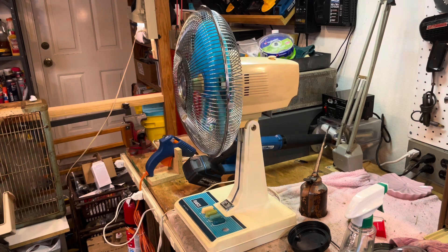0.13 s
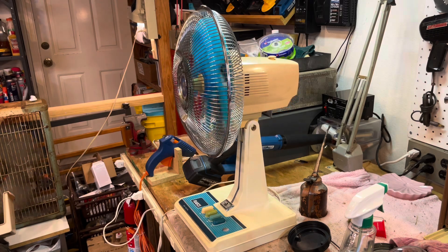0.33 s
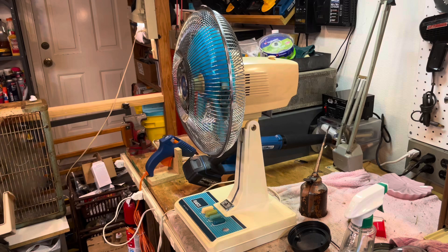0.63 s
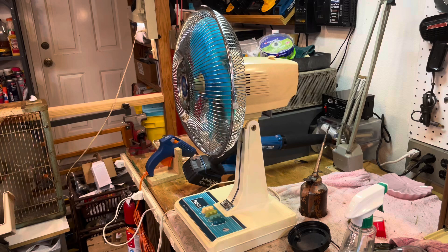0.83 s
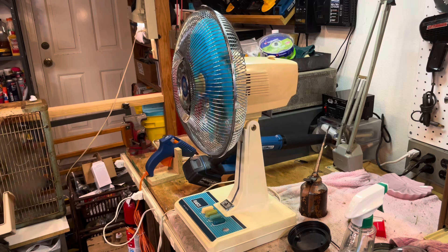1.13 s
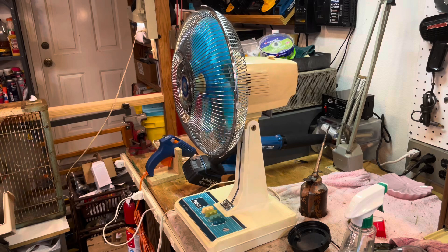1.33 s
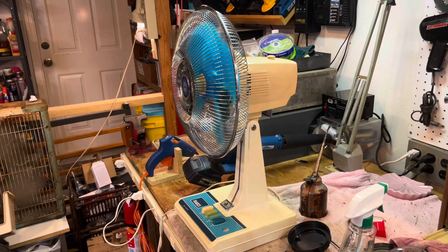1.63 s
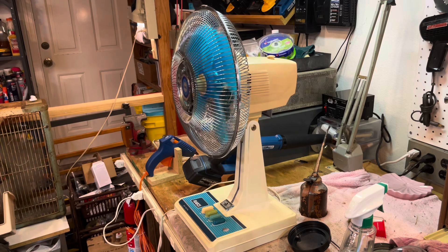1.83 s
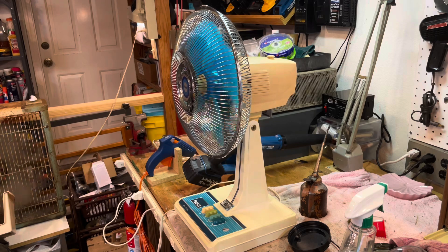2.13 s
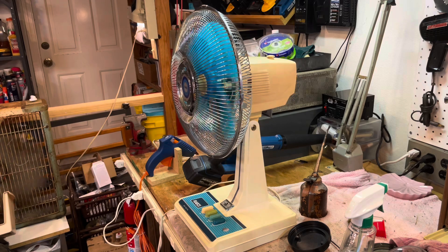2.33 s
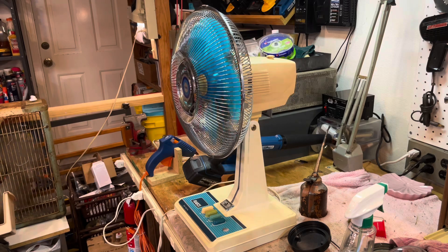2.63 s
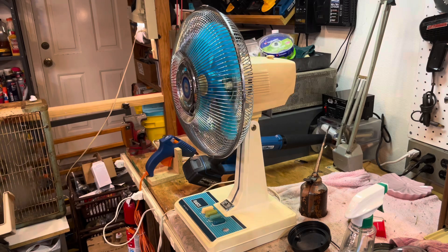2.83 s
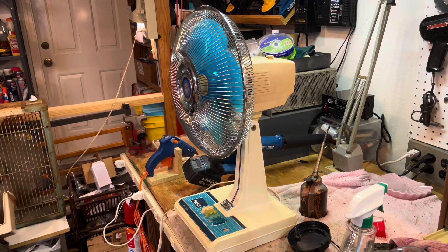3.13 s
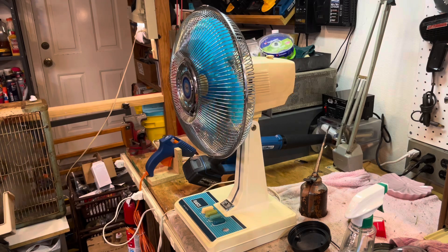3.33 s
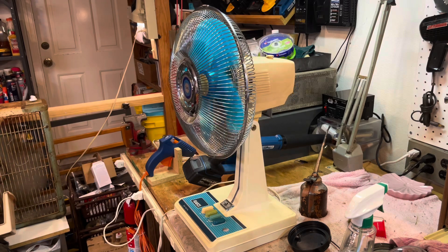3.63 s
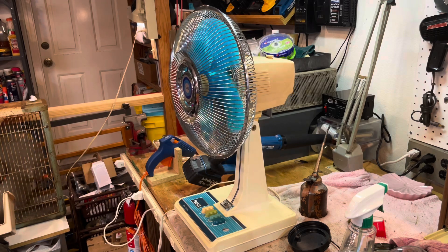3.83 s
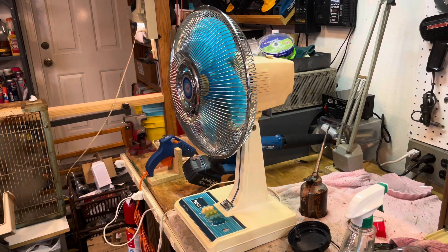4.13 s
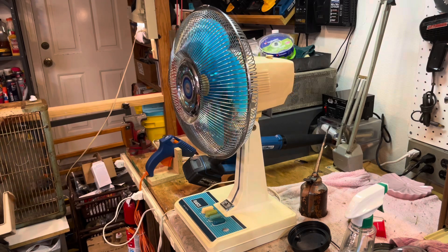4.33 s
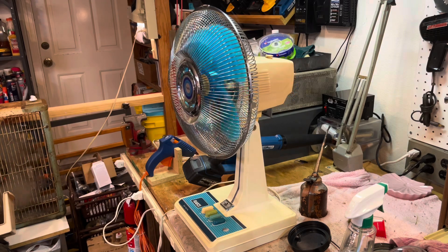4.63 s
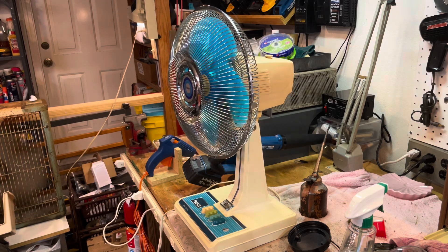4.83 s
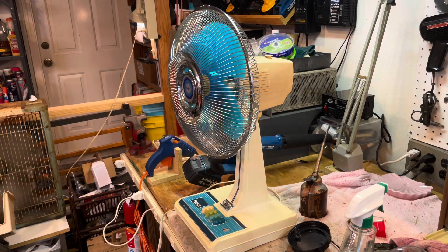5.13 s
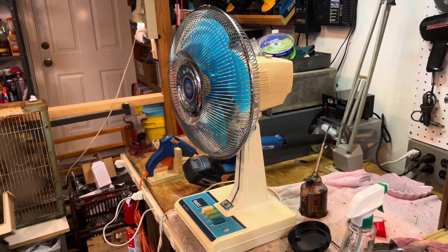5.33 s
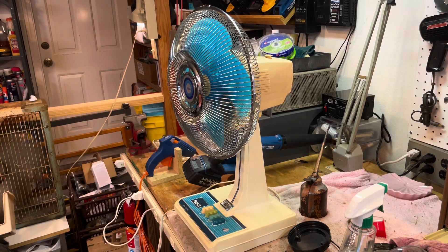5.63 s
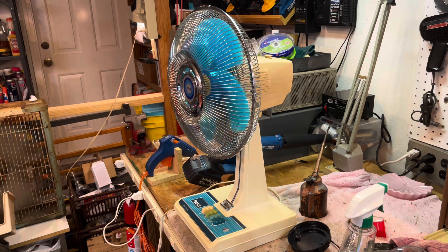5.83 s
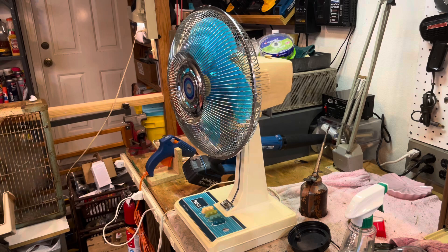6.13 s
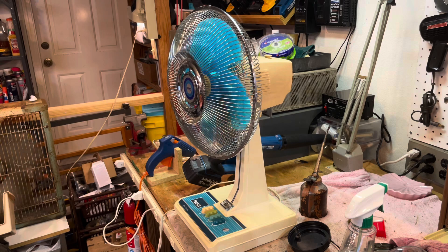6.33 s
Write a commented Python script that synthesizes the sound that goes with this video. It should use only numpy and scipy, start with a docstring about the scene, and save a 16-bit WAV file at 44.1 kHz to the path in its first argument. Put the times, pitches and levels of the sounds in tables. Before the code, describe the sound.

An electric desk fan runs without a break in a cluttered workshop, heard close in stereo. A strong low blade throb and mains hum sit under a soft rush of air with a thin whine. Gusts knock and flutter against the microphone, mostly during the first three seconds, then the bass drops, the flow steadies, and a few thumps return near the end.

```python
"""Desk fan on a workbench

A three-bladed fan slowly swings its head: blade-passing tones throb below band-shaped air noise.
The motor adds mains-harmonic hum, which sinks and returns, and thin whines, all wavering sines.
Turbulent rumble rises in gusts; eddies buffet the two microphone ports as short pressure pulses
with grainy noise flutters. At times the bass sinks away beneath the steady flow."""
import sys
import numpy as np
from scipy import signal
from scipy.fft import rfft, irfft
from scipy.io import wavfile
from scipy.ndimage import uniform_filter1d, minimum_filter1d

SR = 44100
rng = np.random.default_rng(int(sys.argv[2]) if len(sys.argv) > 2 else 0)


def file_out(sig):
    """Save sig as 16-bit WAV at sys.argv[1]."""
    # one column per channel
    cols = np.atleast_2d(sig).T
    # limit, then scale
    lim = np.clip(cols, -1, 1)
    pcm = np.round(lim * 32767).astype(np.int16)
    wavfile.write(sys.argv[1], SR, pcm)


N = 286063
TIME = np.arange(N) / SR  # s
FREQS = np.fft.rfftfreq(N, 1 / SR)  # Hz
SIDES = np.array([[1], [-1]])  # left, right


def undb(db):
    """Logarithmic level: decibels become an amplitude ratio."""
    return 10 ** (np.asarray(db) / 20)


def across(points):
    """Spectral interpolation: points (frequency [Hz], value) are joined on a log-frequency axis."""
    hz, value = np.transpose(points)
    return np.interp(np.log(FREQS + 1), np.log(hz), value)


def walk(rate):
    """Low-passed random process: unit spread, changing about rate times a second."""
    spectrum = rfft(rng.standard_normal(N))
    smoothing = np.exp(-(FREQS / rate) ** 2) * (FREQS > 0)  # no constant part
    y = irfft(spectrum * smoothing, N)
    return y / y.std()


def plateau(start, hold, attack, release):
    """Trapezoidal envelope: rises to 1 by the start, holds, and falls back to 0."""
    rise = 1 + (TIME - start) / attack
    fall = 1 - (TIME - start - hold) / release
    return np.clip(np.minimum(rise, fall), 0, 1)


def tone(hz, db, pan_db, lead, waver, flicker_db):
    """Modulated sinusoid: a spectral line that wavers in phase [rad] and flickers in level [dB]."""
    phase = 2 * np.pi * (hz * TIME + rng.random()) + waver * walk(4.9)
    level_db = db + flicker_db * walk(19.0) + SIDES * pan_db / 2
    return np.sqrt(2) * undb(level_db) * np.sin(phase + SIDES * lead / 2)


def noise(colour_db, side_db, pan_db, lead_s=0):
    """Partial coherence: mid and side noise, the mid of rms 1, reaching the left port lead_s earlier."""
    mid, side = rfft(rng.standard_normal((2, N))) * undb(colour_db)
    pair = mid + SIDES * side * undb(side_db)
    pair = pair * undb(SIDES * pan_db / 2)
    pair = pair * np.exp(1j * np.pi * SIDES * FREQS * lead_s)
    return irfft(pair, N) / irfft(mid, N).std()


def churn(spectrum, side_db, pan_db, span=0.049):
    """Power normalisation: turbulence whose pressure stays even over span seconds."""
    x = noise(across(spectrum), side_db, pan_db)
    power = uniform_filter1d(np.mean(x ** 2, axis=0), int(span * SR))
    return x / np.sqrt(power)


# gusts that reach the microphone: (full-strength start [s], hold [s], draught strength [dB])
GUSTS = [(0.0, 0.33, -30.5), (1.347, 0.37, -32), (2.03, 0.62, -33), (2.796, 0.41, -29.5), (4.2, 0.033, -30),
         (4.847, 0.12, -32), (5.2, 0.12, -37), (5.98, 0.61, -37)]
CALM_DB = -38.5  # draught strength between the gusts
GUST_ATTACK_S, GUST_RELEASE_S = 0.025, 0.1


def draught_db():
    """Intermittency of a turbulent flow: gusts rise out of a calm draught."""
    rises = [(db - CALM_DB) * plateau(start, hold, GUST_ATTACK_S, GUST_RELEASE_S)
             for start, hold, db in GUSTS]
    return CALM_DB + np.max(rises, axis=0)


BLADE_HZ = 57.35  # blade-passing rate
SURGE = 0.076  # dB of throb per dB of draught
# blade-passing tones before the surges and stumbles:
# (multiple of blade rate, level [dB], left minus right [dB], left leads [rad])
BLADE_TONES = [(1, -22.3, 2.1, 0), (2, -50, 2, .3), (3, -45.5, 1, .3), (5, -54, 0, .6)]
# brief dips and swells of the throb in the draught: (time [s], half length [s], change [dB])
STUMBLES = [(0.063, 0.023, -5), (0.175, .016, -16), (0.255, .03, 4), (0.312, 0.013, -15), (0.355, .025, 0),
            (0.533, 0.033, -12), (0.634, 0.12, -7.5), (0.8, 0.034, -9), (1.12, .06, -3), (1.257, .06, 1.5),
            (1.394, .022, -10), (1.46, 0.02, -3.5), (1.583, 0.026, -9), (1.688, .025, 3),
            (1.756, 0.03, -13), (2.186, 0.024, -9), (2.368, .02, 5.5), (2.402, .013, -13),
            (2.543, 0.017, 3.5), (2.585, .025, -4), (2.645, .018, 4), (2.71, .03, -1), (2.762, 0.021, 9.5),
            (2.8, .016, -10), (3.065, .024, -14), (3.35, .05, -6), (3.423, 0.015, 11), (3.47, 0.043, -7),
            (3.716, .024, -7), (4.22, .02, -5), (5.993, 0.02, -5), (6.363, 0.09, 0), (6.45, 0.013, -19)]


def blades(jolt_db=32, port_db=2.2):
    """Blade-passing radiation: harmonic pressure waves surge and stumble, unevenly at the two ports."""
    draught = draught_db()
    jolt = undb(draught + jolt_db)  # unsteadiness [dB], greater in a gust
    throb = sum(tone(k * BLADE_HZ, *rest, waver=0.05, flicker_db=jolt) for k, *rest in BLADE_TONES)
    stumble_db = sum(db * np.exp(-((TIME - s) / half) ** 2) for s, half, db in STUMBLES)
    surge_db = SURGE * (draught - CALM_DB)
    imbalance_db = SIDES * port_db * jolt * walk(8.7)
    return throb * undb(surge_db + stumble_db + imbalance_db)


MAINS_HZ = 60
WHINE_DB = -.5  # trim of all whine tones
# magnetic hum before its level changes:
# (multiple of mains, level [dB], left minus right [dB], left leads [rad])
HUM_TONES = [(2, -37.4, 2, .2), (4, -45.3, 9, .5), (6, -56, -4, 1), (8, -52, 3, .6), (10, -57, 2, .6),
             (12, -61, 5, 1), (18, -63.5, -1, .5)]
# the hum sinks and returns: (time [s], change [dB])
HUM_LEVEL = [(0, -10), (0.35, 2), (0.75, -2.5), (1.3, -0.5), (2.4, -3), (2.8, -4), (3.5, -5.5), (4.2, -.5),
             (6.4, 3)]
# thin tones of motor and housing before the trim:
# (frequency [Hz], level [dB], left minus right [dB], left leads [rad])
WHINE_TONES = [(144.1, -49, 0, .3), (425.8, -50.5, 3, .5), (579, -57, -1, 1), (660.5, -48.5, 16, -1),
               (683.2, -57, 9, -1.5), (771, -59, 10, -1.5), (819.3, -60, 7, -2)]


def motor():
    """Magnetic core hum: mains harmonics flicker more in a gust, with an unsteady whine among them."""
    flicker_db = 1.7 + .2 * (draught_db() - CALM_DB)
    hum = sum(tone(k * MAINS_HZ, *rest, waver=0.1 * k ** .5, flicker_db=flicker_db)
              for k, *rest in HUM_TONES)
    whine = sum(tone(*row, waver=0.6, flicker_db=2.1) for row in WHINE_TONES)
    hum_change_db = np.interp(TIME, *np.transpose(HUM_LEVEL))
    return hum * undb(hum_change_db) + whine * undb(WHINE_DB)


RUSH_DB, RUSH_DB_PER_S = -36.5, -0.1341  # the rush eases a little as the head swings round
# relative spectrum of air rushing through the guard: (frequency [Hz], density [dB per Hz])
RUSH = [(90, -19), (200, -5.5), (360, -5), (550, -7), (720, -16.5), (1030, -19), (1600, -21.5), (2800, -27),
        (4450, -32.5), (6300, -39), (8300, -46.5), (10000, -47), (12000, -52), (13300, -61)]
# resonances of guard, housing and bench: (frequency [Hz], width [Hz], change at centre [dB])
RESONANCES = [(388, 116, -3.5), (547, 88, -9), (678, 81, 4), (626, 15, 0), (785, 79, 5.5), (1292, 52, 3),
              (1840, 91, 1.5), (2324, 28, 3.5), (2840, 690, 0.7), (3500, 140, 2), (3680, 300, -1.5),
              (4200, 37, 6), (4500, 140, 3.5), (5280, 220, 2.5), (7280, 300, 3), (10100, 1500, 0)]
# stereo width of the rush: (frequency [Hz], side minus mid [dB])
RUSH_SIDE = [(60, -23), (110, -11), (200, -5.5), (360, -4), (550, 0.5), (800, .5), (1700, -2), (3200, -1.7),
             (5500, -1.3), (9500, 1), (13100, -10)]
# direction of the rush: (frequency [Hz], left minus right [dB])
RUSH_PAN = [(60, 4), (110, 5), (200, 2.5), (360, 2.5), (660, 3.5), (1190, 2.5), (2170, 0.5), (3950, 2),
            (7190, 4.5), (13100, -3.5)]
# arrival of the rush: (frequency [Hz], left port earlier by [s])
RUSH_LEAD = [(200, -.0003), (360, -.0005), (550, -.0005), (900, .00025)]


def rush(flicker_db=0.44):
    """Aerodynamic broadband noise: air torn by blades and guard wires, coloured by resonances."""
    ringing_db = sum(db / (1 + (2 * (FREQS - hz) / width) ** 2) for hz, width, db in RESONANCES)
    colour_db = across(RUSH) + ringing_db
    air = noise(colour_db, across(RUSH_SIDE), across(RUSH_PAN), across(RUSH_LEAD))
    return air * undb(RUSH_DB + RUSH_DB_PER_S * TIME + flicker_db * walk(36))


def workshop(x, scatter_db=-15, decay=0.031):
    """Diffuse scattering: decaying echoes off bench, shelves and tools ripple the spectrum."""
    age = TIME[:SR // 10]
    echoes = rng.standard_normal((2, len(age))) * np.exp(-age / decay)
    echoes /= np.linalg.norm(echoes, axis=1, keepdims=True)
    scattered = signal.fftconvolve(x, echoes, axes=1)[:, :N]
    return x + undb(scatter_db) * scattered


# relative spectrum of the draught's low rumble: (frequency [Hz], density [dB per Hz])
RUMBLE = [(20, -28), (36, -1), (47, -17), (58, -7), (72, 19.5), (100, 3), (160, 3), (260, -9.5), (450, -16),
          (800, -41), (3000, -93)]


def rumble():
    """Turbulent pressure fluctuation: the draught rolls unevenly, much of it different at each port."""
    roll_db = 2.2 * walk(12)
    turbulence = churn(RUMBLE, side_db=0.0, pan_db=-0.5, span=0.056)
    return turbulence * undb(draught_db() + 3.5 + roll_db)


def pulse(age, hz, cycles, phase):
    """Gaussian-windowed oscillation: a pressure pulse that swings only once or twice."""
    return np.exp(-(age * hz / cycles) ** 2) * np.cos(2 * np.pi * hz * age + phase)


THUMP_HZ, THUMP_CYCLES = 92, .85  # pitch and half length of the dull thump
FLUTTER_S, GRAIN_DB, GRAINS_PER_S = 0.015, 2.5, 110  # half length and graininess of a flutter
# relative spectrum of the flutter: (frequency [Hz], density [dB per Hz])
FLUTTER = [(60, -2), (180, 10.5), (300, 4), (420, -2.5), (600, -3), (850, -12), (1600, -27), (8000, -92)]


def eddies(rows, pan_db=4.5, scatter_db=2, lead=1.11):
    """Vortex impact: a knock and thump in step, differing between ports, inside a grainy flutter."""
    knocks, flutter = np.zeros((2, N)), np.zeros(N)
    chances = rng.standard_normal((len(rows), 3))
    for (s, knock_db, hz, cycles, thump_db, flutter_db), chance in zip(rows, chances):
        span = slice(*np.searchsorted(TIME, [s - .05, s + .05]))
        age = TIME[span] - s
        phase = 2 * np.pi * chance[0] + SIDES * lead * chance[1] / 2
        knock = undb(knock_db) * pulse(age, hz, cycles, phase)
        thump = undb(thump_db) * pulse(age, THUMP_HZ, THUMP_CYCLES, phase)
        balance_db = SIDES * (pan_db + scatter_db * chance[2]) / 2
        knocks[:, span] += (knock + thump) * undb(balance_db)
        flutter[span] += undb(flutter_db) * np.exp(-(age / FLUTTER_S) ** 2)
    grain = undb(GRAIN_DB * walk(GRAINS_PER_S))
    grain /= np.sqrt(np.mean(grain ** 2))
    return knocks + flutter * grain * churn(FLUTTER, side_db=-1.0, pan_db=5.0)


LIGHT_EDDIES_PER_S, LIGHT_SCATTER_DB = 9, 5
LIGHT_HZ, LIGHT_CYCLES = 196, .9  # middle pitch and half length of the knock
LIGHT_KNOCK_DB, LIGHT_THUMP_DB, LIGHT_FLUTTER_DB = 1, 6.5, -8  # relative to the eddy's strength


def light_eddies():
    """Random vortex shedding: small eddies scatter in strength about the draught that carries them."""
    chance = rng.random((200, 3))
    starts = np.cumsum(2 * chance[:, 0]) / LIGHT_EDDIES_PER_S
    scatter_db = LIGHT_SCATTER_DB * (2 * chance[:, 1] - 1)
    strengths = np.interp(starts, TIME, draught_db()) + scatter_db
    pitches = LIGHT_HZ * 2 ** (chance[:, 2] - .5)
    rows = [(s, db + LIGHT_KNOCK_DB, hz, LIGHT_CYCLES, db + LIGHT_THUMP_DB, db + LIGHT_FLUTTER_DB)
            for s, db, hz in zip(starts, strengths, pitches)]
    return eddies(rows)


# hard eddies knocking on the ports:
# (time [s], knock [dB], pitch [Hz], half length [cycles], thump [dB], flutter [dB])
HARD_EDDIES = [(0.018, -27, 179, 0.99, -27, -36), (0.034, -27, 304, 1.2, -26, -29),
               (0.075, -20, 342, 1, -26, -32), (0.085, -20, 202, 1.2, -26, -32),
               (0.098, -19.5, 255, 0.92, -12.5, -32), (0.148, -19.5, 314, 0.77, -26, -38),
               (0.193, -27, 140, .9, -24, -49), (0.244, -18.5, 144, 1, -18, -41),
               (0.281, -30, 130, .9, -29, -44), (0.304, -26, 166, .9, -26, -34),
               (0.473, -25.5, 166, 1.2, -28, -37), (0.789, -19, 290, 0.78, -33, -41),
               (1.351, -24, 135, 0.79, -21, -31), (1.506, -20.5, 155, 0.94, -25, -36),
               (1.513, -20, 260, .6, -23, -36), (1.533, -26, 316, 1, -24, -29),
               (1.658, -20.5, 221, 0.77, -32, -46), (1.674, -23, 220, 1.2, -30, -46),
               (2.012, -23, 179, 0.76, -28, -42), (2.09, -29, 192, .9, -28, -48),
               (2.154, -23, 255, 0.89, -26, -38), (2.221, -19, 179, 0.77, -20, -42),
               (2.34, -15, 156, 0.4, -19, -38), (2.538, -28, 800, .8, -28, -36),
               (2.55, -24, 485, 1.3, -20, -26.5), (2.568, -21.5, 221, 1, -26, -32),
               (2.578, -16, 300, .9, -26, -31), (2.584, -18, 400, 0.87, -23, -32),
               (2.593, -14, 193, 1.1, -18.5, -31), (2.627, -15.5, 155, 0.79, -24, -41),
               (2.652, -14.5, 255, .7, -15.5, -39), (2.675, -25, 166, 1, -34, -38),
               (2.768, -25.5, 255, .9, -27, -34), (2.777, -20.5, 190, 0.95, -31, -35),
               (2.801, -24, 338, 1.1, -35, -36), (2.816, -19, 342, 0.85, -24, -29),
               (2.892, -23, 199, .9, -27, -39), (2.901, -23, 330, .8, -32, -34),
               (2.953, -28, 260, 0.74, -36, -40), (2.98, -24.5, 485, 1, -37, -30),
               (3.014, -24, 400, .7, -34, -35), (3.034, -28, 330, 0.63, -41, -35),
               (3.122, -24, 392, 0.83, -33, -34), (3.138, -21, 430, .8, -33, -32),
               (3.147, -24, 240, 0.39, -24, -48), (5.961, -20, 290, 1.1, -22, -33),
               (5.969, -21, 292, 1.2, -30, -43), (5.983, -21.5, 192, .9, -30, -45),
               (6.009, -22, 170, .8, -23, -38), (6.016, -19, 300, 1.1, -28, -38),
               (6.023, -17, 154, 0.84, -18, -43), (6.049, -14, 154, 0.97, -18, -43),
               (6.262, -17, 134, 1, -28, -41), (6.289, -19.5, 290, .8, -16, -38),
               (6.315, -17.5, 178, 0.73, -19, -51), (6.442, -24.5, 292, 1, -22, -29.5),
               (6.451, -30, 192, 0.75, -25, -41)]


def hard_eddies():
    """Vortex impact at set times: the hardest eddies strike the ports."""
    return eddies(HARD_EDDIES)


BASS_CORNER_HZ, BASS_SINK_S, BASS_DB = 220, 0.23, 0.47  # BASS_DB: bass level outside the dips
# the bass sinks, stays down and returns: (fully down at [s], hold [s], change [dB], return [s])
BASS_DIPS = [(0.55, 0.19, -3, 0.11), (0.95, 0.2, -1.5, 0.05), (2.848, 0.35, -12.5, 0.81)]


def sink_bass(air):
    """Low-shelf filtering: only the part below the corner rises and sinks, as a whole."""
    bass = irfft(rfft(air) / (1 + (FREQS / BASS_CORNER_HZ) ** 4), N)
    dips_db = sum(db * plateau(start, hold, BASS_SINK_S, back) for start, hold, db, back in BASS_DIPS)
    return air + (undb(BASS_DB + dips_db) - 1) * bass


def scene():
    """Superposition: fan and draught share the sinking bass, and the hardest eddies strike through."""
    air = blades() + motor() + workshop(rush()) + rumble() + light_eddies()
    return sink_bass(air) + hard_eddies()


TOP_HZ = 13600
LIMIT, LIMIT_S = .46, .012  # peak amplitude held down, and the window of the gain


def record(dry):
    """Peak limiting and low-pass filtering: the recorder opens softly, tames thumps and cuts the top."""
    opening = np.minimum(TIME / .004, 1)
    size = int(LIMIT_S * SR)
    peak = np.abs(dry).max(axis=0)
    needed = LIMIT / np.maximum(peak, LIMIT)
    gain = uniform_filter1d(minimum_filter1d(needed, size), size)
    top_cut = signal.ellip(8, .2, 70, TOP_HZ, fs=SR, output="sos")
    return signal.sosfilt(top_cut, dry * gain * opening)


dry = scene()
out = record(dry)
file_out(out)
```